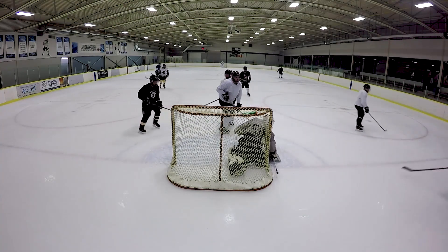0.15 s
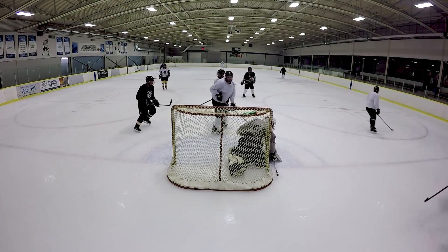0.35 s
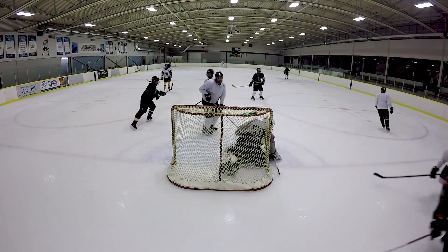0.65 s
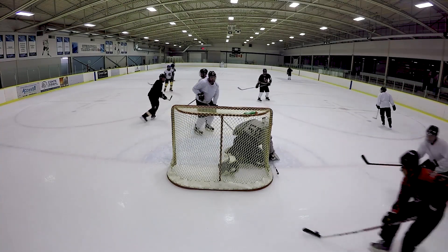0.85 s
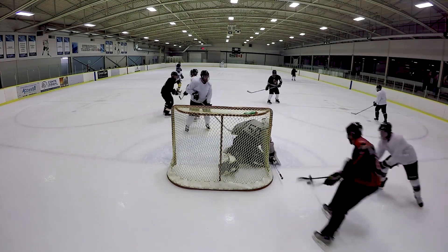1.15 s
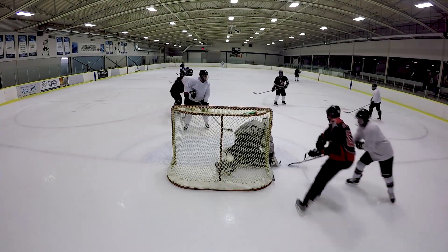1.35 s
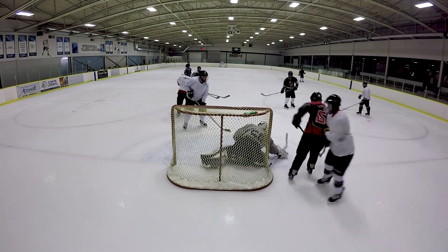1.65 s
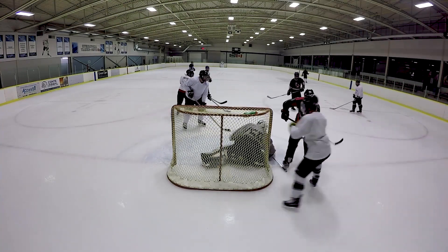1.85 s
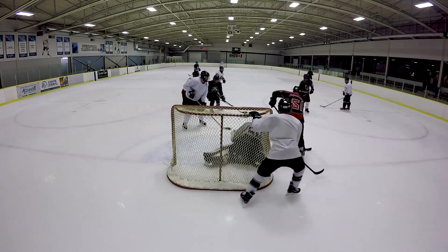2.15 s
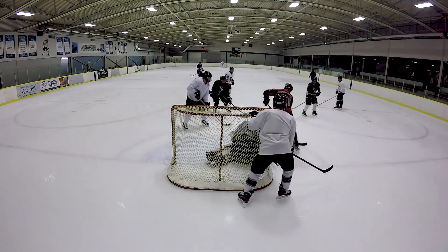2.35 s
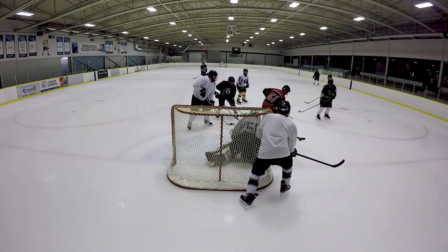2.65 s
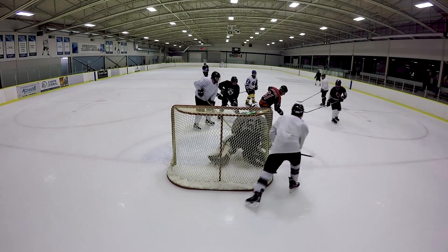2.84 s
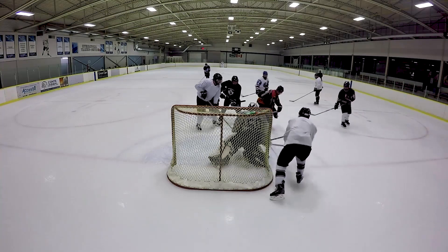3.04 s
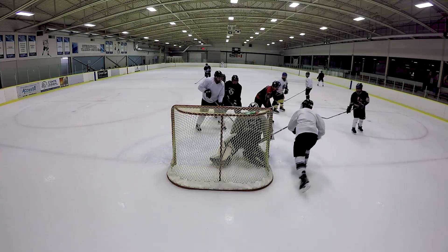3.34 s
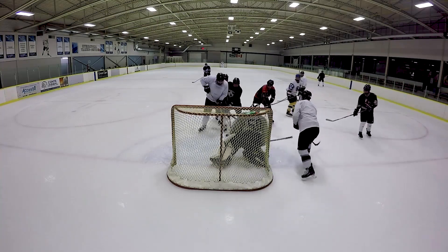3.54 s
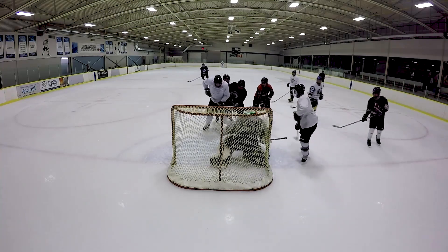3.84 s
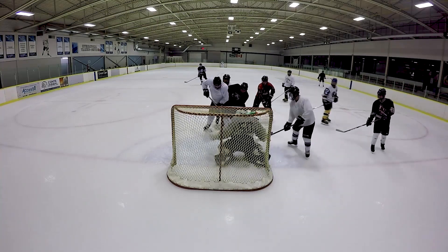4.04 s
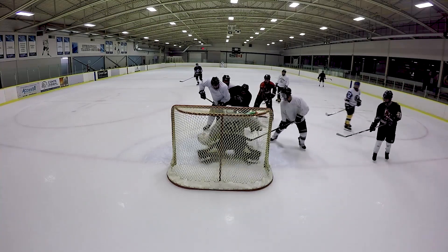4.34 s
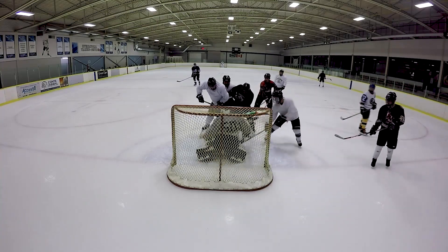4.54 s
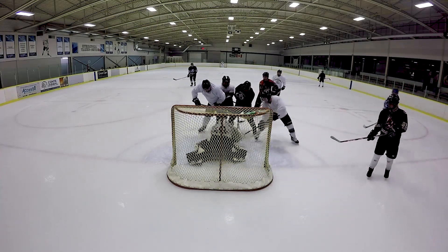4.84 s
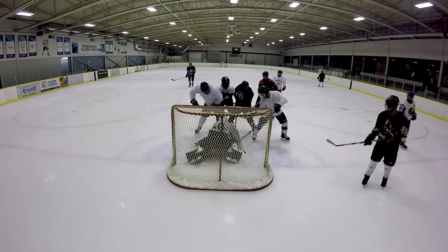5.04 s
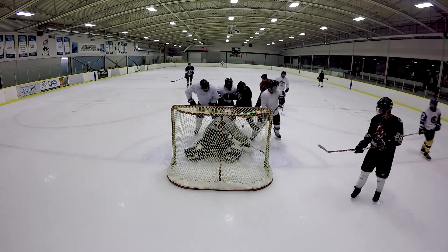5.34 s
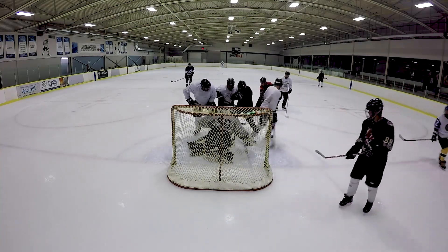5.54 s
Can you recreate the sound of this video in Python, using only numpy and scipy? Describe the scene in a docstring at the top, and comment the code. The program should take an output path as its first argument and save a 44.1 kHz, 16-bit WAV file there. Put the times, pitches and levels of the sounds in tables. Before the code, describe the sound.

Skate blades scrape and carve on ice while sticks, puck and pads clack and thud in an echoing indoor rink, one hard crack leading.

```python
"""Scramble round the net in an indoor ice rink

Blades scrape, carve and throw snow: filtered noise and chips whose power follows each skating stroke.
Sticks, puck and pads clack, one hard shot leading: clicks, fast-dying noise and a sine mode in five bands.
The padding adds dull thuds and flops, a skipping blade short notes, and a hard turn makes the steel ring.
Sparse echoes, dying at each frequency's own rate, ring on for two seconds over the drone of air handling.
All is heard behind the goal through a boxed-in, faintly hissing microphone: resonances, clipping, a low-pass.
"""
import sys
import numpy as np
from scipy import signal
from scipy.fft import rfft, irfft
from scipy.io import wavfile
from scipy.ndimage import uniform_filter1d

SR = 44100
rng = np.random.default_rng(int(sys.argv[2]) if len(sys.argv) > 2 else 0)


def to_wav(s):
    """Save 16-bit WAV."""
    ch = np.atleast_2d(s).T  # columns
    pcm = np.round(np.clip(ch, -1, 1) * 32767)  # PCM
    wavfile.write(sys.argv[1], SR, pcm.astype(np.int16))


N = 250929
TIME = np.arange(N) / SR
GRID = np.fft.rfftfreq(4096, 1 / SR)  # frequencies of every filter design [Hz]

# Source levels hold ahead of the layer trims and the microphone's case; noise spectra are relative.

# Drone of the air handling and faint steady hiss of the microphone: (frequency [Hz], density [dB per Hz])
BACKGROUND_SPECTRUM = [(15, 0), (30, 2.5), (45, 1), (58, 3.5), (80, -4.5), (125, -4.5), (500, -15),
                       (1000, -26), (7000, -37), (16000, -33)]
BACKGROUND_DB = -53.5

# Reverberation of the hall: (frequency [Hz], time to die by 60 dB [s])
HALL_T60 = [(100, 0.4), (500, 1.4), (1200, 1.7), (2500, 1.93), (5000, 1.22), (9000, 0.77), (15000, 0.46)]
# Initial balance of the echoes: (frequency [Hz], gain [dB])
HALL_COLOUR = [(100, -6), (600, -4), (1050, -2.5), (1600, 0), (2400, -0.5), (2850, -2), (3600, -1.5),
               (8000, 2.5), (15000, -5)]

# Flops of the goalkeeper's pads, loudest at half their length: (time [s], level [dB], length [s])
PAD_FLOPS = [(4.803, -53, 0.07), (4.906, -40, 0.023), (4.944, -51.5, 0.094)]
# Noise of a flop: (frequency [Hz], density [dB per Hz])
PAD_SPECTRUM = [(40, -3), (100, -1), (700, -15), (2000, -62)]

# Puck or stick dying in the padding: (time [s], level over 10 ms [dB])
THUDS = [(2.967, -45), (4.767, -49), (4.814, -38), (4.927, -39.5)]
# Padding's filter: (frequency [Hz], gain [dB])
THUD_COLOUR = [(50, 4), (200, -5.5), (560, 3), (820, -2), (1150, -16), (3000, -42)]
THUD_SEND_DB = 2

# The other skaters, always moving: (scraping [dB], deep carving [dB], snow spray [dB])
FAR_SKATERS_DB = (-42.5, -50, -64)
# Strokes of a skate; groove and snow are relative to the scraping:
# (edge fully in [s], held [s], scraping [dB], groove [dB], snow [dB])
STROKES = [(0.0, 0.11, -32, -10, -24.5), (0.5, 0.098, -37, -10.5, -28), (0.8, 0.14, -33.5, -2.5, -13),
           (1.03, 0.23, -35, -5.5, -16.5), (1.329, 0.05, -34, -15, -15), (1.64, 0.099, -32, -12, -31),
           (1.97, 0.057, -36.5, -10.5, -11), (2.078, 0.079, -35, -4, -14.5), (2.731, 0.15, -37, -9, -18),
           (2.95, 0.27, -41, -16, -15.5), (3.655, 0.035, -36.5, -15, -20), (4.12, 0.083, -36, -14, -28),
           (4.34, .22, -38.5, -10, -17.5), (4.76, 0.073, -36.5, -21, -23.5), (5.66, .1, -44, -15, -12.5)]
BITE_S, RELEASE_S = 0.059, 0.075  # time in which a stroke's power grows or dies by a factor e
# Noise of the scraping edge: (frequency [Hz], density [dB per Hz])
SCRAPE_SPECTRUM = [(530, -25), (900, -17.5), (1480, 2), (1840, -4), (2010, -0.5), (2580, 0.5), (3160, -8),
                   (3490, -9.5), (4150, -12), (5380, -19.5), (5810, -19.5), (12000, -58.5), (15600, -70),
                   (22000, -120)]
# Growl of the blade in its groove: (frequency [Hz], density [dB per Hz])
CARVE_SPECTRUM = [(40, -4), (110, -9.5), (220, -8.5), (430, -6), (660, -12), (800, -8), (1000, 0.5),
                  (1250, 0.5), (3000, -50)]
# Thrown snow: (frequency [Hz], density [dB per Hz])
SPRAY_SPECTRUM = [(1500, -43), (3600, 11.5), (4150, 3), (4700, 5.5), (5500, 1.5), (6500, 1.5), (8200, -5),
                  (9900, -5.5), (15500, -25)]
# The finest snow: (frequency [Hz], density [dB per Hz])
MIST_SPECTRUM = [(8200, -34), (10000, 0), (11500, 1), (15500, -9)]

# The steel blade rings in the hardest turn: (edge fully in [s], held [s], level [dB])
SINGING_TURN = (1.271, 0.16, -29.5)
# Ringing of the steel: (frequency [Hz], density [dB per Hz])
STEEL_SPECTRUM = [(1500, -41.5), (2150, -13), (2400, -2), (2520, -1), (2750, -11), (3100, -16), (3500, -14),
                  (3900, -14), (6000, -45.5)]

# A stopping blade skips over the ice, hardest and highest in the middle; fade and sag are per skip from there
CHATTER_MIDDLE_S, SKIP_GAP_S = 2.785, 0.0328
CHATTER_DB, CHATTER_HZ, SKIP_FADE_DB, SKIP_SAG_HZ = -26.5, 910, -5, 27

# Blows of stick, puck or skate; weight lifts the thud, edge the tick, far blows send more to the hall:
# (time [s], level over 10 ms [dB], weight [dB], edge [dB], leading mode [Hz], hall send [dB])
BLOWS = [(0.271, -26.5, 9, -20, 2550, 1), (0.4667, -35.5, 12.5, -18, 1750, 8),
         (0.8643, -34, 4, 10, 2630, -14), (1.1655, -31, 8, -1.5, 2440, 6),
         (1.2221, -18.5, -23, -11, 2410, 2), (1.2238, -13, 0, 13, 2484, -3.5),
         (1.2306, -21.5, 4.5, -5, 2310, -3), (1.675, -31.5, 7, 13, 1020, -1.5),
         (1.7194, -15.5, -16, 1.5, 2240, -0.5), (1.9516, -29, -5, -6, 2630, 7.5),
         (2.1264, -30, 3, 0, 2440, 3.5), (2.2391, -33.5, -1, 21, 2850, 0), (2.2658, -35, -5, 20, 1680, -5),
         (2.429, -39, -3, 15, 2550, 6.5), (2.9907, -32.5, -6, 7, 1950, 6),
         (3.0318, -21.5, -11, -6, 2394, 0), (3.11, -33, 21, -10.5, 1660, -1),
         (3.114, -26, 7, -16, 2720, -6), (3.6358, -28.5, 1.5, -3.5, 1700, -1),
         (3.9233, -29, 0.5, -2.5, 2220, 5.5), (3.956, -29.5, -12, -0.5, 2780, 6),
         (3.973, -27.5, -3, -18, 2100, -13), (4.0035, -28.5, -8.5, -6, 2390, -19),
         (4.1095, -29.5, 8.5, -9.5, 2070, -1), (4.4137, -27, -8, 2, 2220, 0),
         (4.4462, -31, -14, -8, 2250, -7), (4.5049, -32.5, 1.5, 9.5, 2490, -24),
         (4.5789, -27.5, 4, -6, 2800, 3), (4.6249, -25, -1.5, -10, 1700, -11),
         (4.8129, -34, 6.5, 5, 1630, 4.5), (4.845, -29, -20, -7, 2590, -9), (5.4626, -43, 4, -1, 2630, 2),
         (5.599, -30, 3.5, -3.5, 1690, 2.5)]
# Limits of the thud, knock, clack, snap and tick bands: (frequency [Hz])
BLOW_EDGES_HZ = [120, 850, 1800, 4000, 7000, 15000]
# Those five bands: (level in a plain blow [dB], share of the weight [1], share of the edge [1])
BLOW_BANDS = [(-20, 1, 0.3), (-6, 0.48, 0.0056), (0, 0.1, 0.11), (-11.5, 0.44, 0.54), (-25.5, 0, 0.84)]
# First filter of a blow, ahead of its band levels: (frequency [Hz], gain [dB])
BLOW_COLOUR = [(60, -7), (200, 2), (600, -1.5), (1000, 0.5), (1600, 2), (2600, -3), (3200, -8.5),
               (4300, -12.5), (5500, -20), (7500, -27), (13000, -38), (16000, -68)]
RING_T60_S, LIGHT_RISE_S = 0.023, 0.002
# Blade or puck lands again, weaker and thinner
REBOUND_S, REBOUND_JITTER_S = 0.026, 0.0015
REBOUND_DB, REBOUND_WEIGHT_DB, REBOUND_EDGE_DB = -15, -1.5, 4

# Peaks and notches of the microphone's case: (frequency [Hz], full width at half the dB [Hz], gain [dB])
CASE_MODES = [(1030, 145, 3), (1166, 230, -4), (1650, 120, 2.5), (1810, 89, -1.5), (2550, 126, 3.5),
              (2800, 210, 2.5), (3118, 370, -6.5), (3375, 245, 5.5), (3500, 170, 0), (3590, 65, -1),
              (4193, 386, -6), (4710, 110, 3), (5380, 170, 4.5)]
BAND_LIMIT_HZ = 15700


def gain_of(db):
    """Logarithmic level: decibels to amplitude."""
    return 10 ** (np.asarray(db) / 20)


def evened(x):
    """Normalization of power: scales to rms 1."""
    return x / np.sqrt(np.mean(x ** 2) + 1e-20)


def read(points, hz):
    """Log-frequency interpolation: joins the points of a spectrum table by lines."""
    f, value = np.transpose(points)
    return np.interp(np.log(hz + 1), np.log(f + 1), value)


def add(mix, s, sound):
    """Superposition: mixes a sound in at time s."""
    part = mix[max(round(s * SR), 0):][:len(sound)]
    part += sound[:len(part)]


def colour(x, db):
    """Minimum phase: a causal filter with the given gain on GRID rings only after what strikes it."""
    log_gain = np.log(gain_of(np.maximum(db, -100)))
    circle = np.concatenate([log_gain, log_gain[-2:0:-1]])
    # the Hilbert transform of the log gain gives the phase
    taps = np.fft.ifft(np.exp(np.conj(signal.hilbert(circle)))).real
    return signal.oaconvolve(x, taps)[:len(x)]


def background():
    """Stationary broadband noise: the drone of the air handling and faint steady hiss of the microphone."""
    spectrum = rfft(rng.standard_normal(N))
    gain = gain_of(read(BACKGROUND_SPECTRUM, np.fft.rfftfreq(N, 1 / SR)))
    return gain_of(BACKGROUND_DB) * evened(irfft(spectrum * gain, N))


def hall(x, delay=0.012, early_db=4, early_s=0.057, lumpy_db=0.5):
    """Reverberation: sparse echoes of glass, boards and roof, each band dying at its own speed."""
    t = np.arange(2 * SR) / SR
    echoes = (rng.random(len(t)) < 2500 / SR) * rng.choice([-1, 1], len(t)) * (t > delay)
    echoes = echoes * gain_of(lumpy_db * rng.standard_normal(len(t)) + early_db * np.exp(-t / early_s))
    hz, age, z = signal.stft(echoes, SR, nperseg=256)
    decay_db = -60 * age / read(HALL_T60, hz)[:, None]
    tail = signal.istft(z * gain_of(read(HALL_COLOUR, hz)[:, None] + decay_db))[1]
    # unit energy for an uncoloured tail dying by 60 dB in 2 s
    reference = np.linalg.norm(echoes * gain_of(-30 * t))
    return signal.fftconvolve(x, tail / reference)[:N]


def pads():
    """Displacement of air: soft padding lands with a dull push that swells and dies."""
    t, out = np.arange(SR // 2) / SR, np.zeros(N)
    for s, db, length in PAD_FLOPS:
        push = evened(colour(rng.standard_normal(len(t)), read(PAD_SPECTRUM, GRID)))
        age = 2 * t / length
        add(out, s, gain_of(db) * push * age * np.exp(1 - age))
    return out


def thuds():
    """Damped impact: a single soft push, as the padding swallows the ring and the treble."""
    push = colour(signal.unit_impulse(4096), read(THUD_COLOUR, GRID))
    push = push / np.linalg.norm(push) * np.sqrt(SR / 100)  # rms 1 over 10 ms
    out = np.zeros(N)
    for s, db in THUDS:
        add(out, s, gain_of(db) * push)
    return out


def crunch(per_s, spread_db, share, patchy_db, surge_db=1.0):
    """Brittle fracture: chips of uneven size in a fine hiss; the edge bites in patches and surges."""
    sizes = gain_of(spread_db * np.minimum(rng.exponential(1, N), 4))
    chips = (rng.random(N) < per_s / SR) * rng.choice([-1, 1], N) * sizes
    share = np.clip(share, 0, 1)  # of the power that is chips
    x = np.sqrt(share) * evened(chips) + np.sqrt(1 - share) * rng.standard_normal(N)
    z = signal.stft(x, nperseg=512)[2]
    # patches vary over frequency and time, surges over time only
    patches = uniform_filter1d(rng.standard_normal(z.shape), size=7, axis=0)
    patches = evened(uniform_filter1d(patches, size=5, axis=1))
    surges = evened(uniform_filter1d(rng.standard_normal(z.shape[1]), size=7))
    return evened(signal.istft(z * gain_of(patchy_db * patches + surge_db * surges))[1][:N])


def pressure(s, held):
    """Exponential growth and decay: a stroke's power, 0-1, as the edge bites, holds and lets go."""
    before = np.maximum(s - TIME, 0)
    after = np.maximum(TIME - s - held, 0)
    return np.exp(-before / BITE_S - after / RELEASE_S)


def stroke_levels():
    """Addition of powers: scraping, carving and spray in dB, all strokes over the far skaters."""
    power = gain_of(FAR_SKATERS_DB)[:, None] ** 2 * np.ones(N)
    for s, held, db, groove_db, snow_db in STROKES:
        peak_power = gain_of([db, db + groove_db, db + snow_db])[:, None] ** 2
        power = power + peak_power * pressure(s, held)
    return 10 * np.log10(power)


def skates():
    """Friction and fracture: edges always scrape; near blades also growl in their groove and shave off snow."""
    scrape_db, carve_db, spray_db = stroke_levels()
    scraping = crunch(per_s=900, spread_db=1.5, share=0.27, patchy_db=1.83)
    scrape = evened(colour(scraping, read(SCRAPE_SPECTRUM, GRID)))
    carving = crunch(per_s=300, spread_db=2.0, share=0.33, patchy_db=3.5)
    carve = evened(colour(carving, read(CARVE_SPECTRUM, GRID)))
    snow = crunch(per_s=2100, spread_db=4.5, share=0.33, patchy_db=2.5)
    spray = evened(colour(snow, read(SPRAY_SPECTRUM, GRID)))
    mist = evened(colour(snow[::-1], read(MIST_SPECTRUM, GRID)))  # reversed, to differ from the spray
    mist_db = 2 * spray_db + 40.0  # rises twice as fast as the spray: only hard, near cuts throw it
    edges = scrape * gain_of(scrape_db - 2.5) + carve * gain_of(carve_db - 3.0)
    return edges + spray * gain_of(spray_db + 5.5) + mist * gain_of(mist_db)


def singing_blade():
    """Driven resonance: chips of ice strike a hard-loaded blade and keep it ringing."""
    s, held, db = SINGING_TURN
    chips = crunch(per_s=400, spread_db=1.5, share=0.46, patchy_db=2.2)
    ring = evened(colour(chips, read(STEEL_SPECTRUM, GRID)))
    return gain_of(db) * ring * pressure(s, held)


def chatter(length=0.0072, count=5):
    """Intermittent contact: each skip of the blade is a short soft-edged note of a few cycles."""
    t, out = np.arange(0, length, 1 / SR), np.zeros(N)
    envelope = np.sin(np.pi * t / length) ** 2
    for k in np.arange(count) - count // 2:
        note = envelope * np.sin(2 * np.pi * (CHATTER_HZ - SKIP_SAG_HZ * abs(k)) * t)
        level = gain_of(CHATTER_DB + SKIP_FADE_DB * abs(k))
        add(out, CHATTER_MIDDLE_S + k * SKIP_GAP_S, level * note)
    return out


def blow(levels_db, hz, t60, contact=5.8, firm_db=-28, tone=0.26):
    """Impact excitation: a contact click, a dense fast-dying ring and one leading mode, balanced by band."""
    t = np.arange(4096) / SR
    firmness = min(gain_of(levels_db.max() - firm_db), 1) ** 2  # light touches brush on, firm ones crack
    dying = gain_of(-60 * t / max(t60, 0.004))
    swell = 1 - np.exp(-t / (LIGHT_RISE_S * (1 - firmness) + 10 / SR))
    ring = rng.standard_normal(len(t)) * dying * swell
    click = contact * firmness * (t == 0)
    mode = tone * firmness * np.sin(2 * np.pi * hz * t) * dying * swell
    x = colour(ring + click, read(BLOW_COLOUR, GRID)) + mode
    edges = np.array(BLOW_EDGES_HZ)
    centres = np.sqrt(edges[1:] * edges[:-1])
    for _ in range(2):  # brings thud, knock, clack, snap and tick towards their levels
        energy = np.histogram(GRID, edges, weights=abs(rfft(x)) ** 2)[0] * 2 / len(t)
        present_db = 10 * np.log10(energy / (SR / 100))  # over 10 ms
        x = colour(x, read(np.c_[centres, levels_db - present_db], GRID))
    return x


def blows():
    """Repeated impact: all blows and their rebounds, heard directly and as sent into the hall."""
    direct, sent = np.zeros(N), np.zeros(N)
    rebounds = []
    for s, db, weight_db, edge_db, hz, send_db in BLOWS:
        again_s = s + REBOUND_S + REBOUND_JITTER_S * rng.standard_normal()
        rebounds.append((again_s, db + REBOUND_DB, weight_db + REBOUND_WEIGHT_DB,
                         edge_db + REBOUND_EDGE_DB, hz, send_db))
    plain_db, by_weight, by_edge = np.transpose(BLOW_BANDS)
    for s, db, weight_db, edge_db, hz, send_db in BLOWS + rebounds:
        levels_db = db + plain_db + weight_db * by_weight + edge_db * by_edge
        sound = blow(levels_db, hz, RING_T60_S)
        add(direct, s, sound)
        add(sent, s, gain_of(send_db) * sound)
    return direct, sent


def scene():
    """Superposition of direct and reverberant sound; the echoes swing steadily between two patterns."""
    direct, sent = blows()
    blades = skates() + singing_blade() + chatter()
    knocks = thuds()
    into_hall = gain_of(-1.5) * sent + gain_of(-10.0) * blades + gain_of(THUD_SEND_DB) * knocks
    swing = np.pi * TIME / 0.7  # the two patterns share a constant total power
    echoes = hall(into_hall * np.cos(swing)) + hall(into_hall * np.sin(swing))
    return (gain_of(0.24) * direct + blades + knocks + pads() + echoes + background())[None]


def record(dry):
    """Resonance, overload and band limit: the case colours all, peaks clip, then a low-pass."""
    case_db = sum(db / 2 ** ((2 * (GRID - hz) / width) ** 2) for hz, width, db in CASE_MODES)
    boxed = np.clip(colour(dry[0], case_db), -0.92, 0.92)
    low_pass = signal.firwin(401, BAND_LIMIT_HZ, window=("kaiser", 9), fs=SR)
    return signal.oaconvolve(boxed, low_pass, "same")[None]


dry = scene()
out = record(dry)
to_wav(out)
```